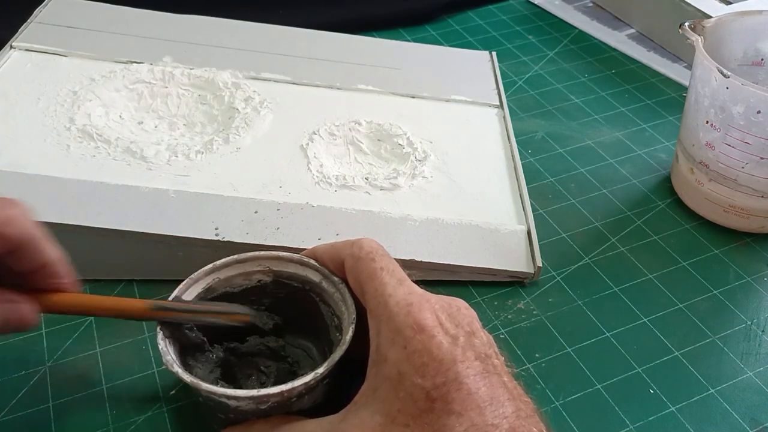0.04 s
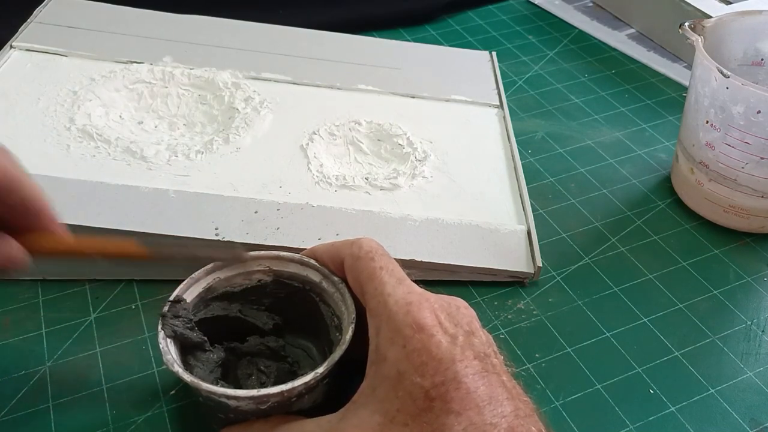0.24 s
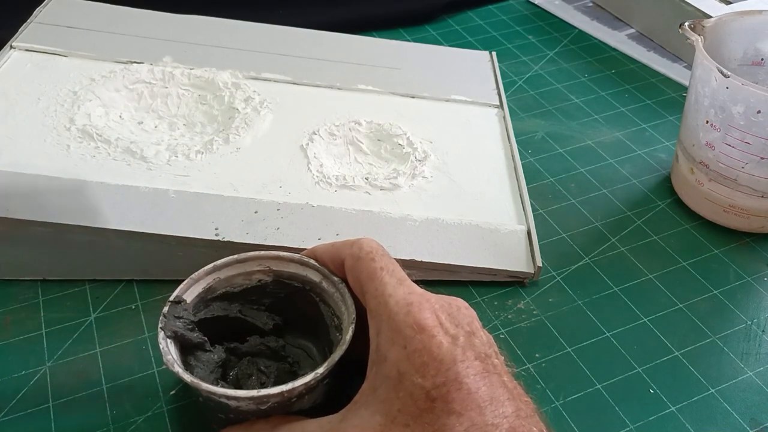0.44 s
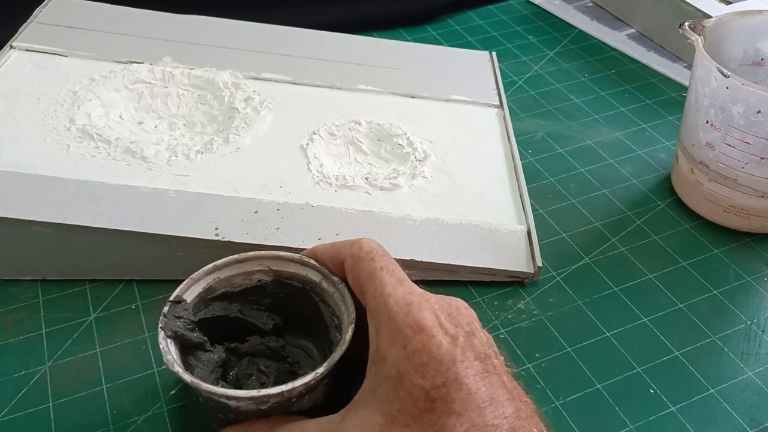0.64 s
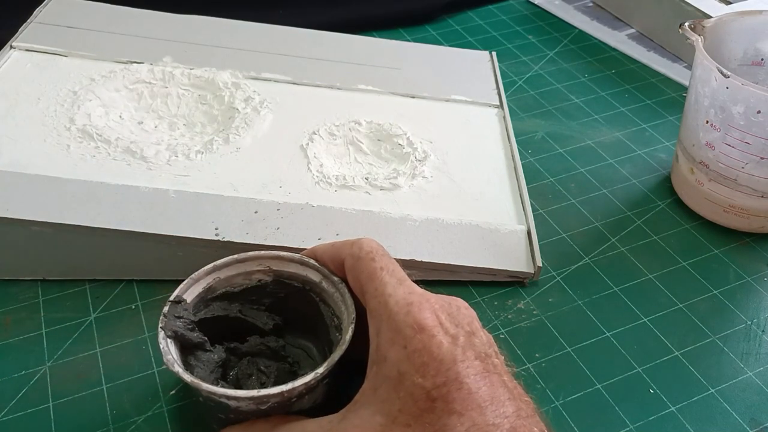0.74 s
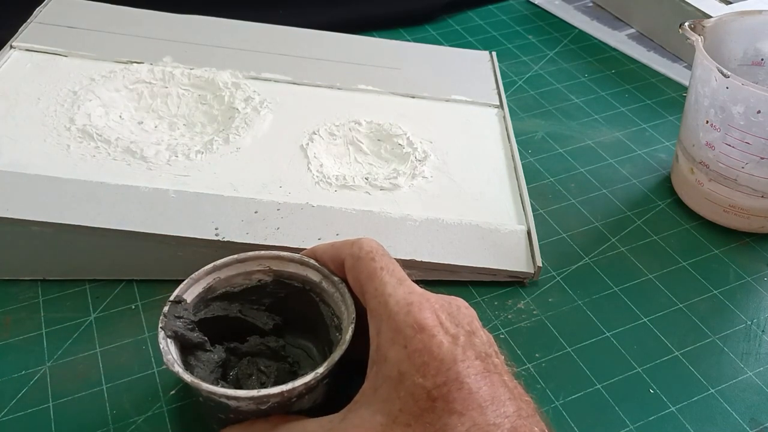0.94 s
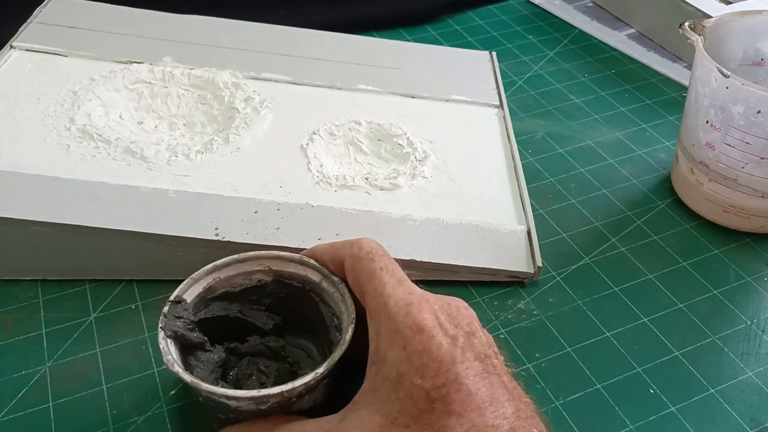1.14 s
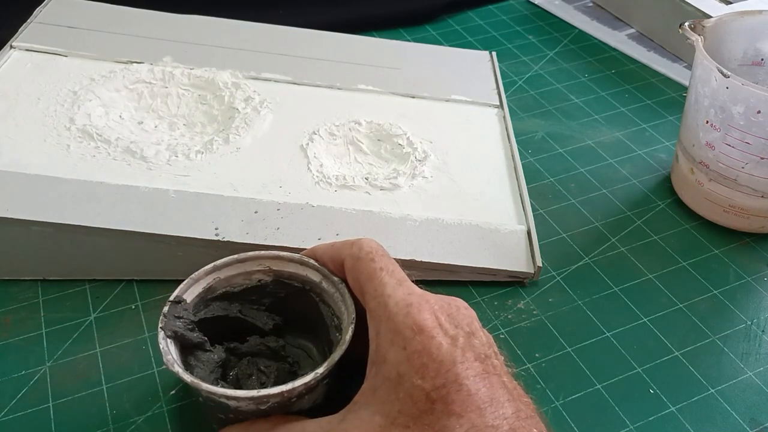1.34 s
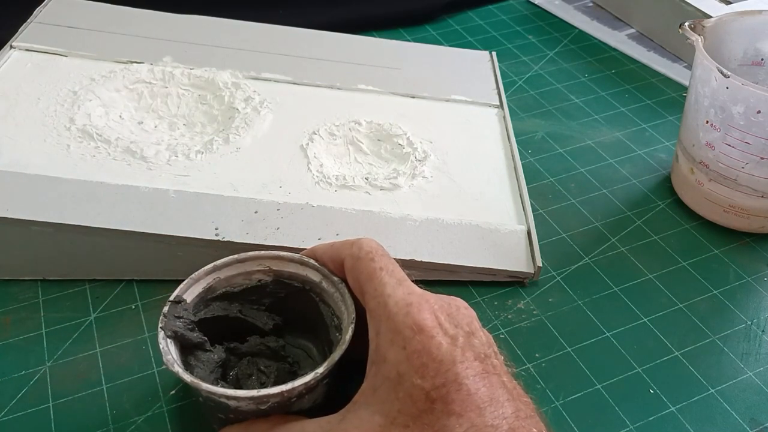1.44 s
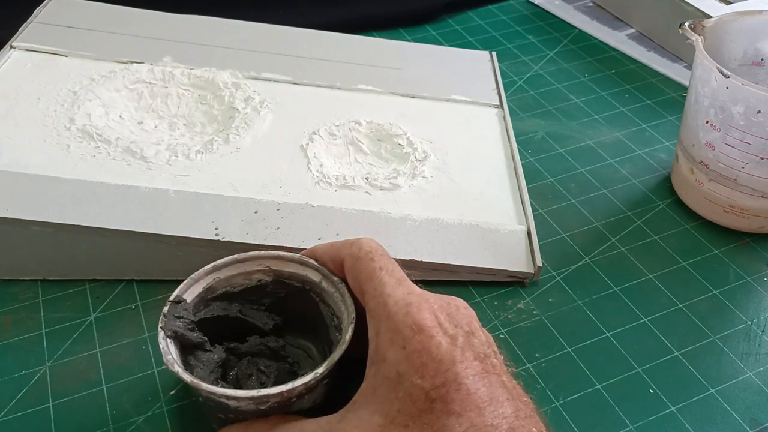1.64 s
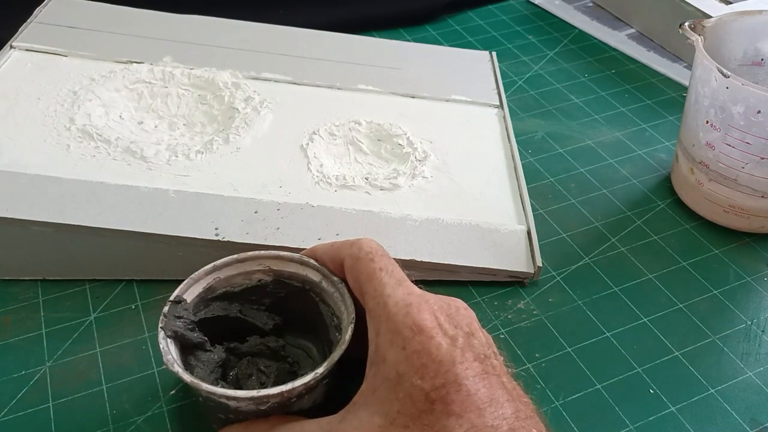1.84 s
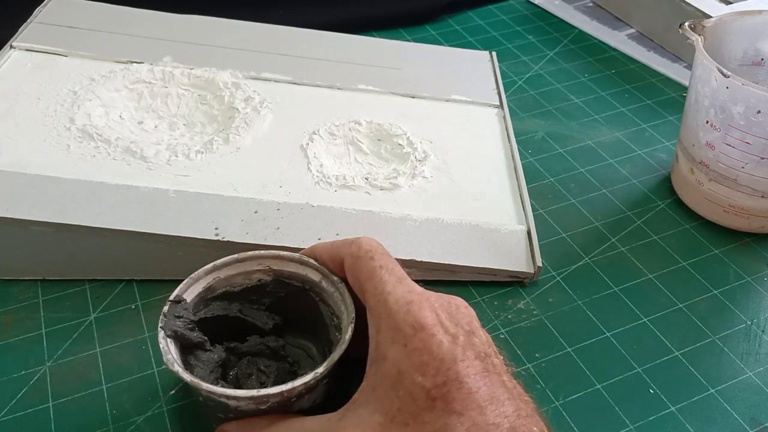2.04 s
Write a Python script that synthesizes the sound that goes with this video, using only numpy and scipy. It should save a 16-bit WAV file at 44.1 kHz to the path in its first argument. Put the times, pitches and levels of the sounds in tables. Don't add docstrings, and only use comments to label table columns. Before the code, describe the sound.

A brush handle scrapes and knocks twice on the rim of a small pot of wet grout, then after a quiet gap clatters onto the bench; close microphone, small room, low hum.

```python
import sys
import numpy as np
from scipy import signal
from scipy.fft import rfft, irfft
from scipy.io import wavfile
from scipy.ndimage import uniform_filter1d

SR = 44100
rng = np.random.default_rng(int(sys.argv[2]) if len(sys.argv) > 2 else 0)


def voltage_ratio(level):
    return 10 ** (np.asarray(level, float) / 20)


def wrap_up_sound(samples):
    columns = np.atleast_2d(samples).T
    tamed = np.clip(columns, -1, 1)
    steps = np.round(tamed * 32767).astype(np.int16)
    wavfile.write(sys.argv[1], SR, steps)


N = 92610
t = np.arange(N) / SR
HALF_SECOND = t[:SR // 2]


def unit(x):
    return x / np.sqrt(np.mean(x ** 2))


def colour(x, points):
    hz_points, db_points = np.array(points, float).T
    hz = np.arange(N // 2 + 1) * SR / N + 1
    gain = voltage_ratio(np.interp(np.log(hz), np.log(hz_points), db_points))
    return irfft(rfft(x) * gain, N)


def highpass(x, hz):
    return signal.sosfilt(signal.butter(4, hz, "high", fs=SR, output="sos"), x)


def conv(x, response):
    return signal.fftconvolve(x, response)[:N]


def ring(modes):
    u = HALF_SECOND
    return sum(voltage_ratio(db - 60 * u / t60) * np.sin(2 * np.pi * hz * u) for hz, db, t60 in modes)


def energy_root(response):
    return np.sqrt(np.sum(response ** 2))


def strokes(rows):
    total = 0
    for start, rise, hold, fall, db in rows:
        onset = np.sin(np.pi / 2 * np.clip((t - start) / rise, 0, 1)) ** 2
        falling = np.clip(t - start - rise - hold, 0, 9)
        total = total + voltage_ratio(db - 60 * falling / fall) * onset
    return total


def pushes(rows):
    return sum(voltage_ratio(db) * np.exp(-((t - s) / w) ** 2 / 2) / (w * SR * np.sqrt(2 * np.pi))
               for s, db, w in rows)


def soft_pushes(rows):
    return pushes([(s, db, ms / 1000) for s, db, ms in rows])


def grains(rate, spread_db):
    chance = rng.random(N)
    size = rng.exponential(1, N)
    noise = rng.standard_normal(N)
    hit = np.clip((rate / SR - chance) * 50 + .5, 0, 1)
    return unit(hit * voltage_ratio(spread_db * np.minimum(size, 4)) * np.sign(noise) + 0.24 * noise)


def walk(rate):
    k = int(SR / rate)
    return unit(uniform_filter1d(uniform_filter1d(rng.standard_normal(N), k), k))


# f/Hz, level/dB per Hz
AIR = [(28, -15), (80, 0), (200, 1.5), (450, -8.5), (1020, -8.5), (2900, -20), (4600, -35.5), (16000, -40)]


def background():
    phase = 2 * np.pi * 100.6 * t + 4.04 + .16 * walk(25)
    hum = np.sqrt(2) * voltage_ratio(-49 + 0.5 * walk(18.0)) * np.sin(phase)
    air = colour(rng.standard_normal(N), AIR)
    air = air / np.std(highpass(air, 130))
    return hum + air * voltage_ratio(-59.5 + .6 * walk(5))


# f/Hz, t60/s, tail level/dB
ROOM = [(117.3, 0.47, -1.5), (278, 0.28, -2.5), (816, 0.35, -8), (1400, 0.39, -10), (2780, 0.21, -9.5),
        (6260, 0.027, -8), (10600, 0.044, -12)]


def room(x):
    u = HALF_SECOND
    swell = np.clip(u / 0.0013, 0, 1) ** 2
    tail = 0
    for hz, t60, db in ROOM:
        sos = signal.butter(2, [hz / 1.5, hz * 1.45], "band", fs=SR, output="sos")
        band = signal.sosfilt(sos, rng.standard_normal(len(u)))
        band = band * voltage_ratio(-60 * u / t60) * swell
        tail = tail + voltage_ratio(db) * band * np.sqrt(13.8 / t60 / SR)
    return conv(x, tail)


# t/s, level/dB, smear/ms
TICKS = [
    (.195, -63, 3.4),
    (0.2455, -47, 3.1),
    (0.5438, -41, 2.1),
    (0.908, -61, 2.5),
    (1.055, -67.5, 3.1),
    (1.8942, -37.5, 0.99),
    (1.917, -49.5, 4),
    (1.938, -42.5, 2.2),
    (2.01, -54, 1.3),
    (2.0519, -58, 4.7),
]
# f/Hz, level/dB per Hz
TICK_COLOUR = [(2000, -40.5), (5000, -0.5), (6800, -16.5), (9000, -5.5), (12000, -14.5), (16000, -19)]


def ticks():
    env = 0
    for s, db, ms in TICKS:
        decay = np.exp(-np.clip(t - s, 0, 1) * 1000 / ms)
        env = env + voltage_ratio(db) * decay * np.clip((t - s) * 5000, 0, 1)
    return env * unit(colour(rng.standard_normal(N), TICK_COLOUR))


# f/Hz, level/dB, t60/s
METAL = [(4870, -3, .04), (6550, -9, .04), (7030, -7, .05), (8770, -9, .04), (10400, -5, .025),
         (11150, -9, .05), (11800, -7, .06), (12700, -5, .03), (13200, -3, .025), (14300, -6, .035),
         (14900, -8, .03)]
# start t/s, rise/s, hold/s, fall t60/s, level/dB
SHAKES = [
    (1.762, 0.0025, .008, 0.028, -51),
    (1.78, 0.003, 0.016, 0.066, -44.5),
    (1.812, 0.0026, 0.017, 0.26, -48.5),
    (1.89, .01, 0.042, 0.079, -61.5),
    (1.945, 0.017, 0.028, 0.19, -64),
]


def jingle():
    metal = ring(METAL)
    return conv(grains(3500, 2.5) * strokes(SHAKES), metal) / energy_root(metal)


# start t/s, length/s, f/Hz, level/dB
SQUEAKS = [(-.01, 0.021, 310, -44), (0.039, 0.056, 307, -41), (0, 0.059, 1380, -49.5),
           (.005, 0.074, 2780, -54), (0.054, .03, 1680, -50), (0.145, 0.049, 560, -52.5),
           (0.598, 0.021, 480, -40), (0.637, 0.052, 320, -42), (0.638, 0.029, 850, -44),
           (.655, 0.046, 1360, -47.5), (0.693, .03, 860, -44), (2.043, 0.032, 1590, -52),
           (2.054, 0.059, 1110, -48), (2.042, 0.029, 2720, -57), (2.043, 0.053, 4880, -65),
           (.41, .035, 2900, -64)]


def squeaks():
    wander = 0.74 * walk(53)
    rough = voltage_ratio(1 * walk(67))
    tones = 0
    for s, length, hz, db in SQUEAKS:
        swell = np.sin(np.pi * np.clip((t - s) / length, 0, 1))
        tones = tones + voltage_ratio(db) * swell * np.sin(2 * np.pi * hz * t + wander)
    return rough * tones


# f/Hz, level/dB, t60/s
JAR = [(861, -6, .025), (1040, 0, .03), (1130, -3, .05), (1340, -5, .03), (1630, -4, .04), (2720, -9, .03),
       (3060, -13, .025), (4080, -24, .03), (4900, -30, .12)]
# start t/s, rise/s, hold/s, fall t60/s, level/dB
NUDGES = [
    (1.62, 0.0056, 0.019, 0.13, -54.5),
    (2.036, 0.0022, 0.0091, 0.13, -65),
    (2.05, 0.0026, 0.0064, 0.089, -45),
]


def nudged_jar(slip):
    jar = ring(JAR)
    return conv(slip * strokes(NUDGES), jar) / energy_root(jar)


# f/Hz, level/dB, t60/s
CLICK = [(2200, 0, .014), (1550, -5, .014), (2950, -8, .02)]


def plastic_click():
    return conv(pushes([(1.936, -33, 4e-5)]), ring(CLICK))


# start t/s, rise/s, hold/s, fall t60/s, level/dB
SLIDES = [
    (1.77, 0.0051, .002, 0.026, -49.5),
    (1.779, 0.00051, .004, 0.073, -40.5),
    (1.784, 0.0028, 0.012, 0.012, -33),
    (1.811, 0.0017, 0.014, 0.11, -31),
    (1.835, 0.012, 0.01, 0.42, -46.5),
    (1.93, 0.0065, 0.0067, 0.1, -76),
]
# f/Hz, level/dB per Hz
BENCH = [(100, -39.5), (300, 4), (700, -5), (1500, -15), (3000, -11), (6500, -20.5), (10000, -24),
         (15800, -26)]
# f/Hz, level/dB, t60/s
TOOLS = [(328, -2, .06), (614, 0, .05), (1330, -9, .06), (1590, -2, .045), (1900, -11, .05),
         (2290, -10, .035), (2500, -9, .03), (3080, -12, .035), (4060, -17, .03), (4530, -15, .04),
         (4870, -19, .09), (7030, -19, .07), (1050, -9, .03), (255, -7, .05)]
# t/s, level/dB, softness/ms
TAPS = [
    (1.786, -53, 0.054),
    (1.794, -33, 0.32),
    (1.801, -25, 0.11),
    (1.812, -28, 0.018),
    (1.8165, -50, 0.8),
    (1.8212, -22, 0.16),
    (1.835, -32.5, 0.2),
    (1.849, -45, 0.06),
    (1.917, -45.5, 0.059),
    (2.042, -44.5, 0.029),
]


def bench():
    slip = grains(6000, 2.4)
    scrape = strokes(SLIDES)
    tools = ring(TOOLS)
    shaken = voltage_ratio(-.8) / energy_root(tools) * conv(highpass(slip, 910) * scrape, tools)
    tapped = conv(soft_pushes(TAPS), tools)
    rung = shaken + tapped + plastic_click() + nudged_jar(slip)
    return unit(colour(slip, BENCH)) * scrape + highpass(rung, 132)


# start t/s, rise/s, hold/s, fall t60/s, level/dB
WIPES = [
    (-.03, 0.02, 0.045, 0.15, -42.5),
    (.25, 0.019, 0.033, 0.35, -43),
    (.30, 0.034, 0.037, 0.11, -43),
    (.425, 0.0032, 0.0055, 0.03, -96),
    (.552, 0.026, 0.052, 0.14, -47),
    (.625, 0.012, 0.0055, 0.047, -47),
    (.655, 0.016, 0.049, 0.23, -73.5),
    (1.94, 0.0067, 0.042, 0.46, -61),
    (.39, .01, .005, 0.086, -63),
]
# f/Hz, level/dB per Hz
GRIT = [(290, -38.5), (500, -12.5), (707, -9.5), (1370, -1.5), (1540, -3.5), (2790, -6), (5830, -20.5),
        (9950, -11), (15800, -23)]
# start t/s, rise/s, hold/s, fall t60/s, level/dB
DRAGS = [
    (.0, 0.017, 0.018, 0.25, -60),
    (.11, 0.055, 0.012, 0.5, -45),
    (.2, 0.043, 0.014, 0.085, -56.5),
    (.34, .02, .04, .08, -52),
    (.405, 0.012, 0.016, 0.13, -61),
    (.66, 0.014, 0.01, 0.18, -50),
    (2.035, 0.0051, 0.01, 0.049, -53),
]
# f/Hz, level/dB per Hz
PASTE = [(120, -20), (200, -20), (418, -5.5), (559, -3.5), (1090, -2), (1340, -1), (3650, -11.5),
         (4100, -29), (5400, -25.5), (12000, -47.5), (16000, -60)]
# start t/s, rise/s, hold/s, fall t60/s, level/dB
FLICKS = [
    (1.538, 0.017, 0.0044, 0.059, -50),
    (1.563, 0.0023, 0.0042, 0.15, -51),
]
# f/Hz, level/dB per Hz
BRISTLE = [(880, -43), (1500, -30), (2200, -9.5), (2820, -13), (3110, -21), (4040, -16), (4940, -30),
           (10800, -13), (15800, -24.5)]


def wipes():
    grit = unit(colour(grains(6000, 2), GRIT)) * voltage_ratio(1.77 * walk(40))
    paste = unit(colour(grains(5000, 4.9), PASTE)) * voltage_ratio(1.5 * walk(55))
    bristle = unit(colour(grains(5300, 4.1), BRISTLE))
    return grit * strokes(WIPES) + paste * strokes(DRAGS) + bristle * strokes(FLICKS)


# f/Hz, level/dB, t60/s
BOARD = [(66, -26.5, 0.067), (128.6, -19.5, 0.063), (186.3, -28, 0.43), (204.2, -24.5, 0.12),
         (307, -21.5, 0.12), (381, -22.5, 0.16), (472.7, -18, 0.065), (610, -43, 0.12), (753, -16, 0.12),
         (806, -41.5, 0.056), (1330, -39, 0.11), (1256, -45, 0.043), (1506, -26, 0.13), (2650, -17, 0.12)]
# t/s, level/dB, softness/ms
THUDS = [
    (.003, -16.5, 0.44),
    (.045, -11.5, 0.9),
    (1.769, -16, 0.61),
    (1.81, -5, 0.86),
    (2.089, -9.5, 0.48),
]


def bench_top(force):
    board = ring(BOARD) * np.clip(HALF_SECOND / 0.018, 0, 1)
    return highpass(conv(force + soft_pushes(THUDS), board), 26)


# delay t/s, level/dB
ECHOES = [(.0081, -40.5), (.0104, -23.5), (0.0114, -28), (.021, -42), (0.031, -19)]


def reflections(blow):
    mat = (.00231, -1.6)
    return sum(voltage_ratio(db) * np.interp(t - lag, t, blow) for lag, db in [mat] + list(ECHOES))


# t/s, level/dB, hardness
KNOCKS = [
    (.24598, 0, 1.08),
    (.54427, -.6, 1.12),
]
# t/s, level/dB, hardness
BOUNCES = [
    (.038, -29, 1.3),
    (.3555, -24, 1.1),
    (.636, -30, 1.2),
]
# f/Hz, level/dB, t60/s, polarity towards the microphone
POT = [(570, 3.8, .0118, 1), (578, 8.9, .0073, -1), (1072, -9.1, .057, -1), (1493, 1.3, .015, 1)]
# f/Hz, level/dB, t60/s
HANDLE = [(2186, -10, 0.0066), (2775, -14, 0.013), (3230, -16, 0.0017), (4400, -28.5, .006)]


def knocks():
    hits = list(KNOCKS) + list(BOUNCES)
    radiate_hz = 194
    force = pushes([(s, db, .000147 / hard) for s, db, hard in hits])
    snap = pushes([(s, db, .00009 / hard) for s, db, hard in hits])
    pot = sum(side * ring([(hz, db, t60)]) for hz, db, t60, side in POT)
    blow = highpass(conv(force, pot), radiate_hz)
    handle = highpass(conv(snap, ring(HANDLE)), radiate_hz)
    return blow + reflections(blow) - handle + bench_top(force)


def scene():
    near = knocks() + wipes() + bench() + ticks()
    heard = near + room(near) + background()
    return (heard + squeaks() + jingle())[None]


def microphone_port(x):
    port_hz, width_hz = 9870, 513
    b, a = signal.iirpeak(port_hz, port_hz / width_hz, fs=SR)
    return x + (voltage_ratio(12) - 1) * signal.lfilter(b, a, x)


def limiter(x):
    ahead = KNOCKS[1][0] - t
    depth = np.clip(1 - ahead / 0.075, 0, 1) * np.clip(ahead * 500 - .5, 0, 1)
    return x * voltage_ratio(-4 * depth)


GAPS = [
    .42,
    1.423,
    1.762,
]


def dropouts(x):
    gap = sum(np.exp(-((t - s) / .007) ** 4) for s in GAPS)
    treble = signal.sosfiltfilt(signal.butter(3, 3600, "high", fs=SR, output="sos"), x)
    return x - (1 - voltage_ratio(-16)) * gap * treble


def roll_off(x):
    return signal.sosfilt(signal.butter(12, 16250, fs=SR, output="sos"), x)


def record(dry):
    x = dropouts(limiter(microphone_port(dry)))
    x = signal.sosfilt(signal.ellip(8, .2, 70, 15750, fs=SR, output="sos"), x)
    return roll_off(x)


dry = scene()
out = record(dry)
wrap_up_sound(out)
```